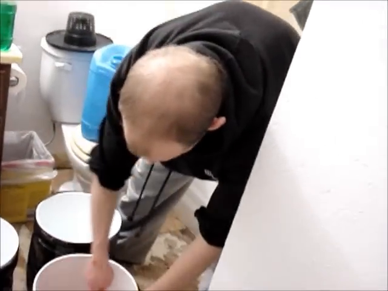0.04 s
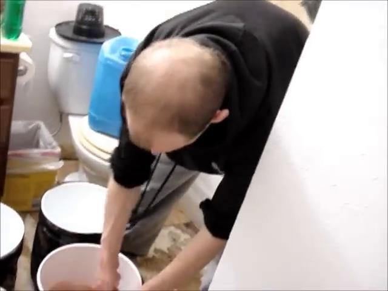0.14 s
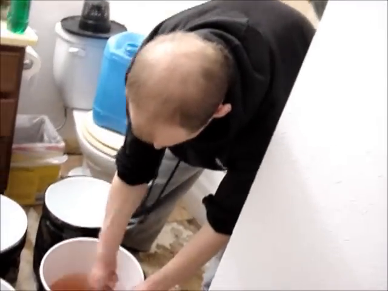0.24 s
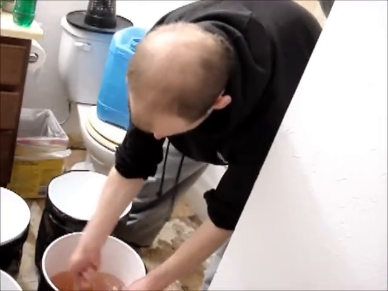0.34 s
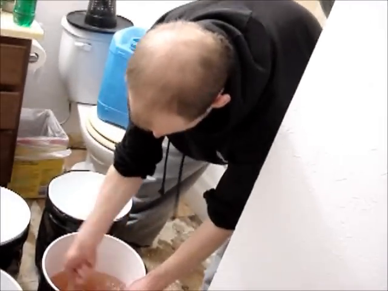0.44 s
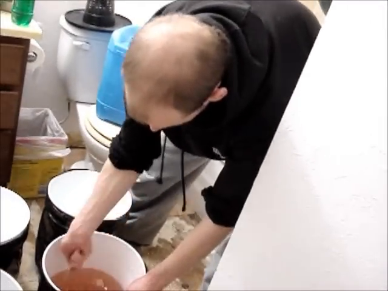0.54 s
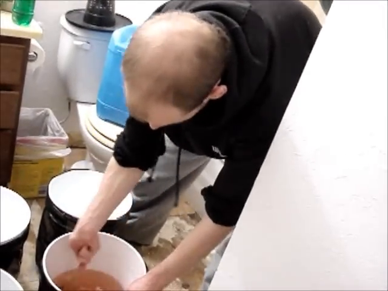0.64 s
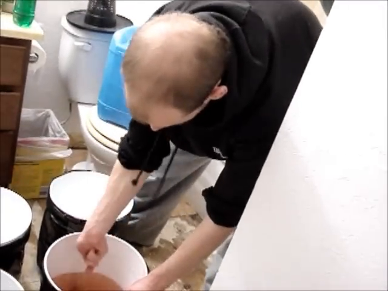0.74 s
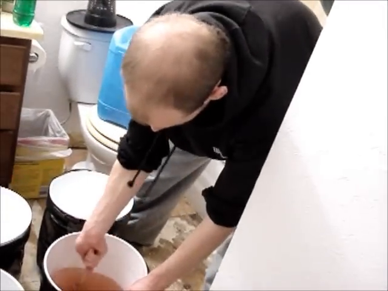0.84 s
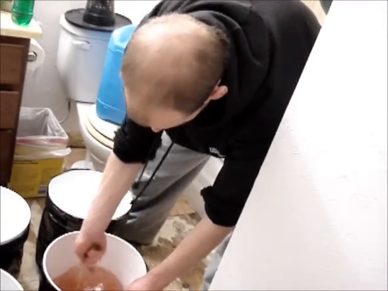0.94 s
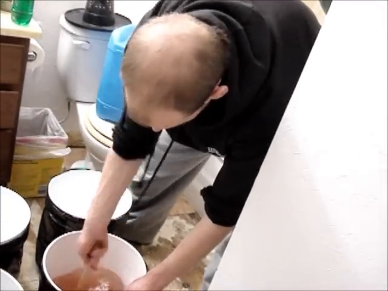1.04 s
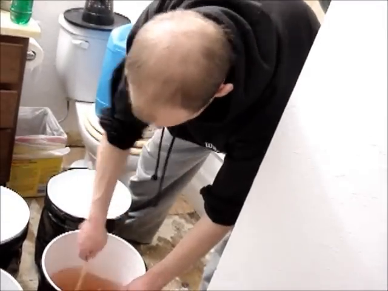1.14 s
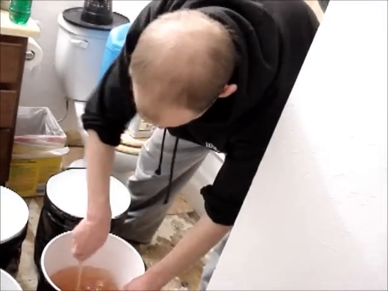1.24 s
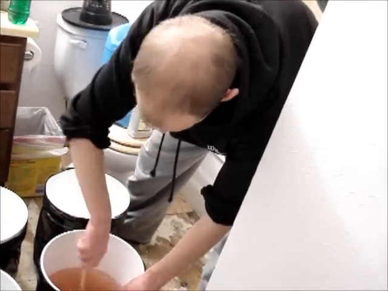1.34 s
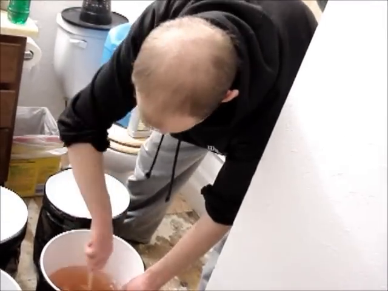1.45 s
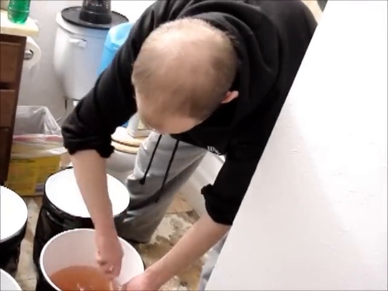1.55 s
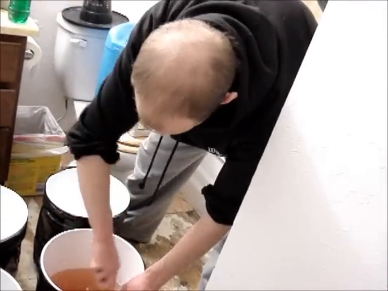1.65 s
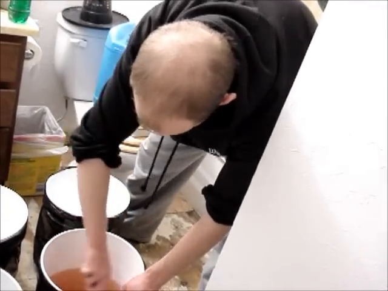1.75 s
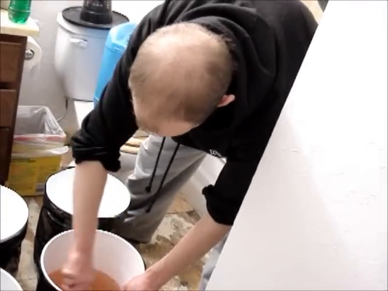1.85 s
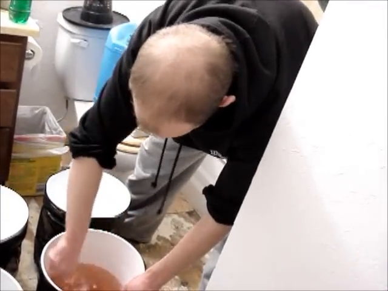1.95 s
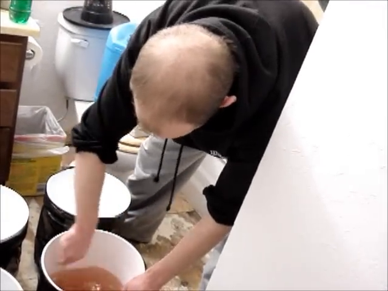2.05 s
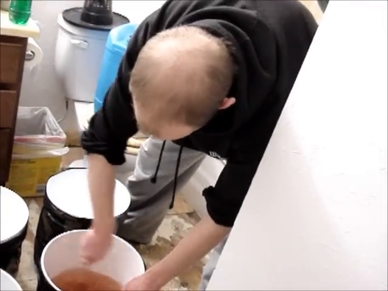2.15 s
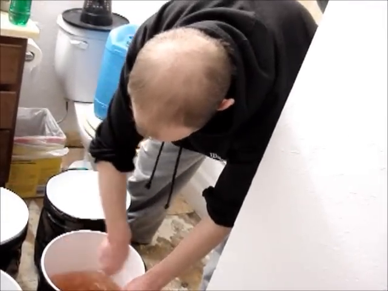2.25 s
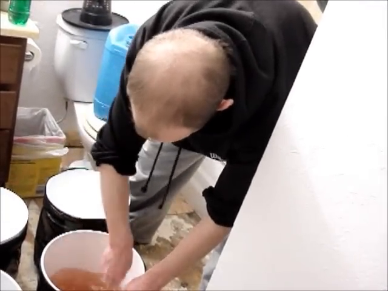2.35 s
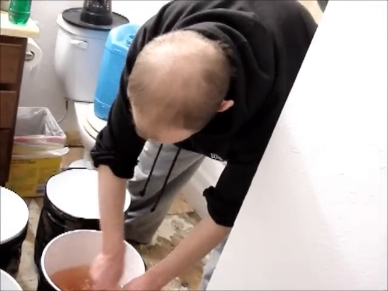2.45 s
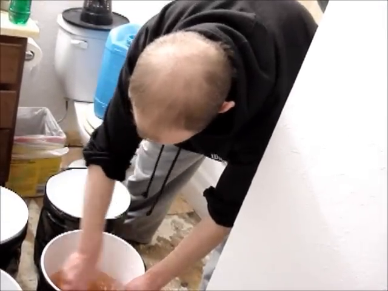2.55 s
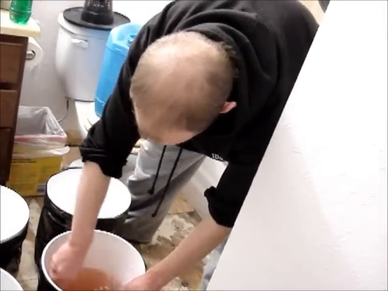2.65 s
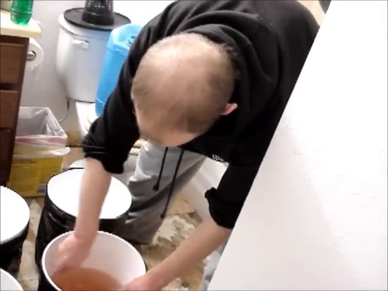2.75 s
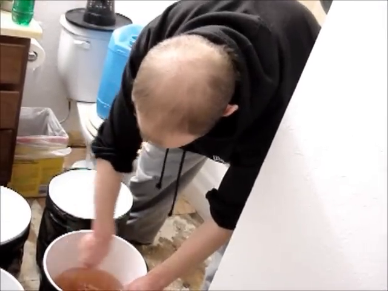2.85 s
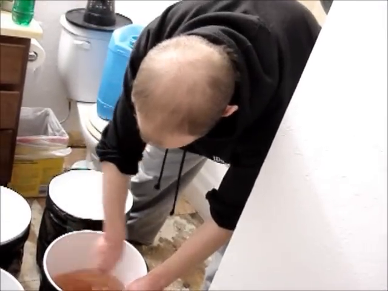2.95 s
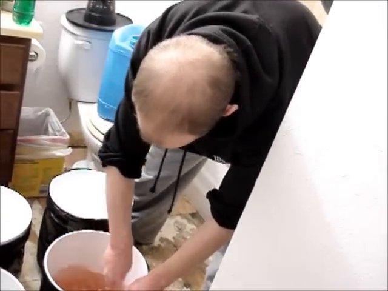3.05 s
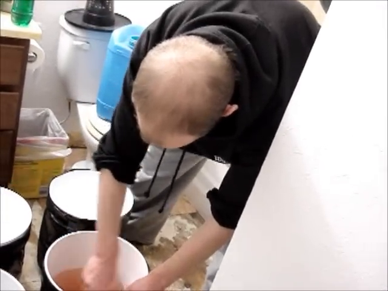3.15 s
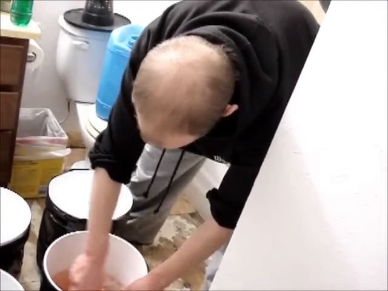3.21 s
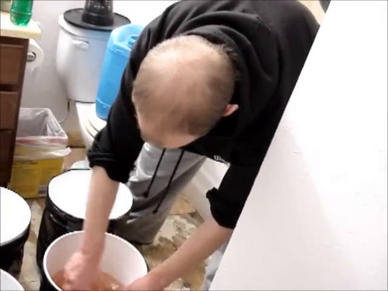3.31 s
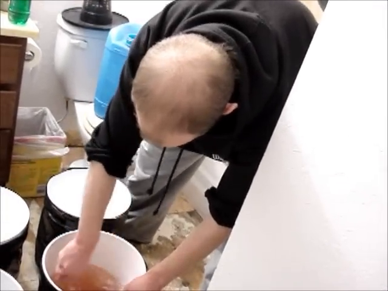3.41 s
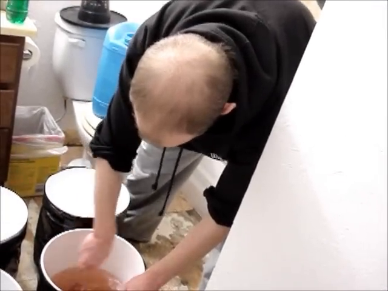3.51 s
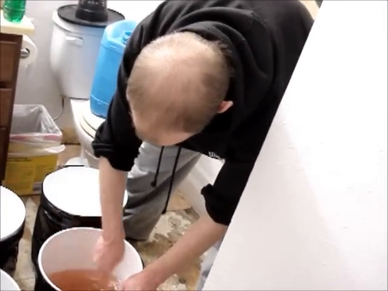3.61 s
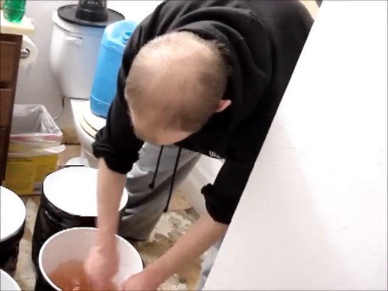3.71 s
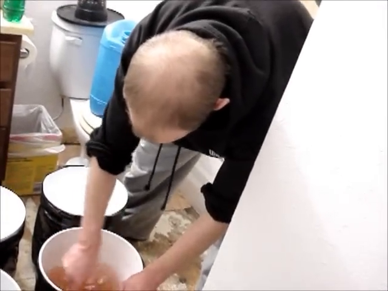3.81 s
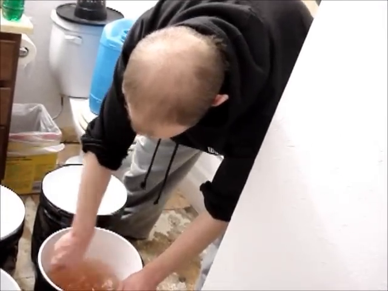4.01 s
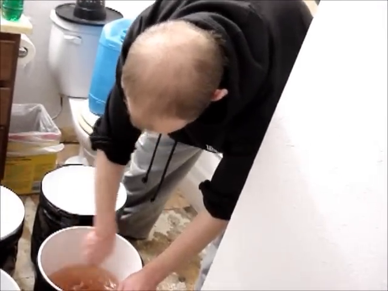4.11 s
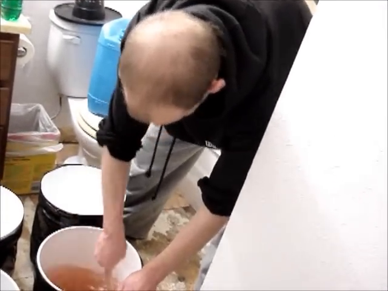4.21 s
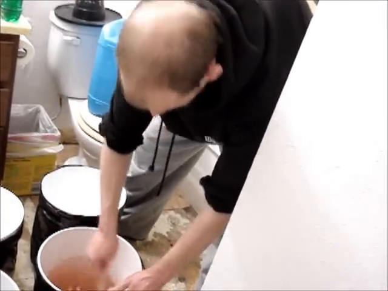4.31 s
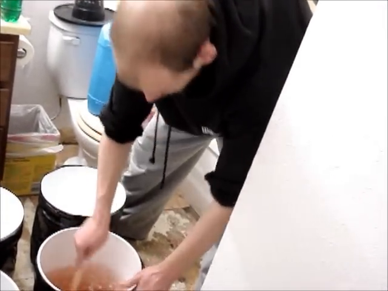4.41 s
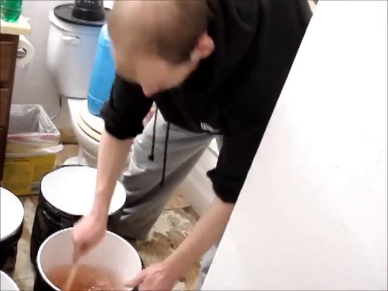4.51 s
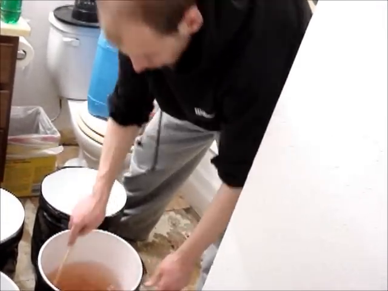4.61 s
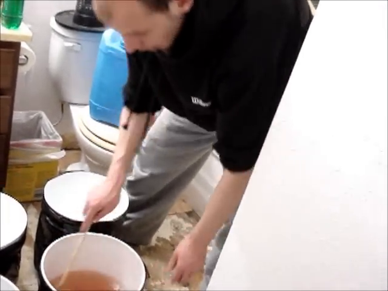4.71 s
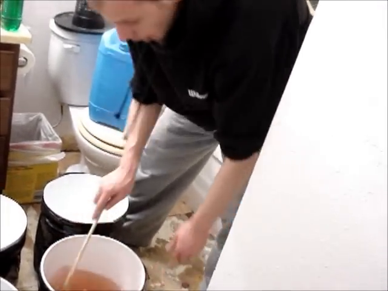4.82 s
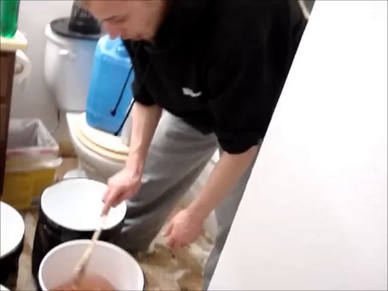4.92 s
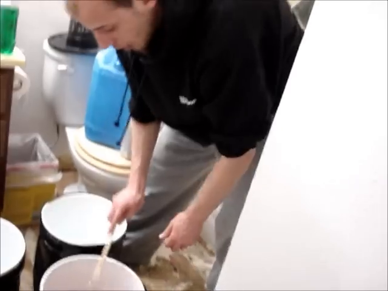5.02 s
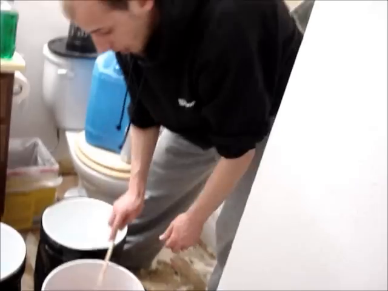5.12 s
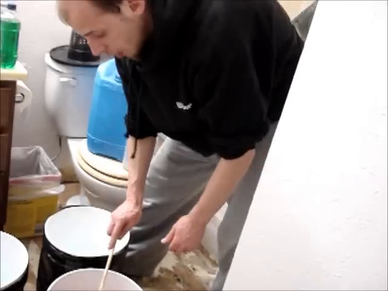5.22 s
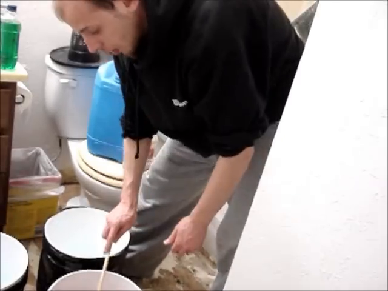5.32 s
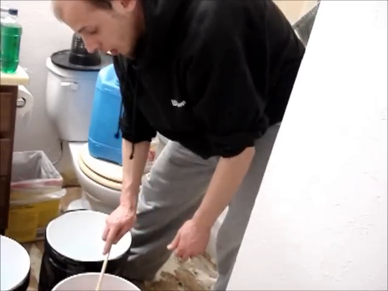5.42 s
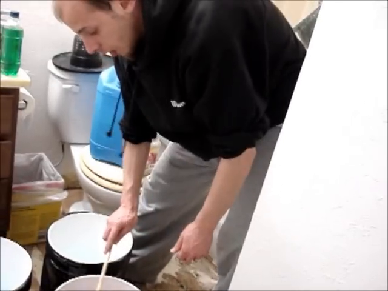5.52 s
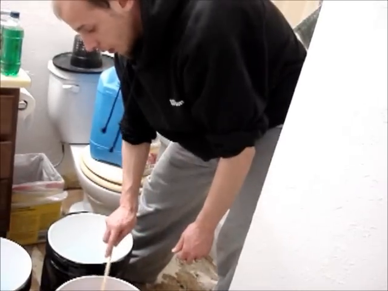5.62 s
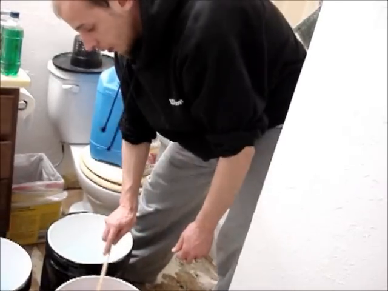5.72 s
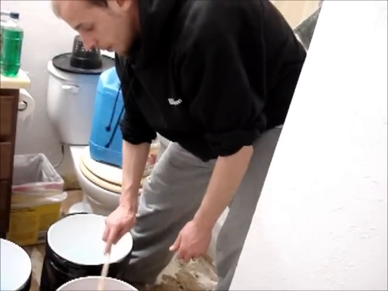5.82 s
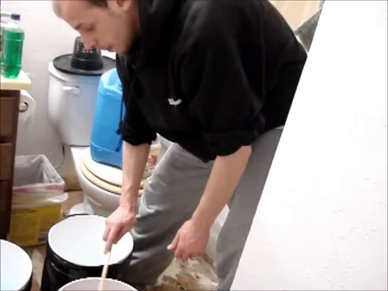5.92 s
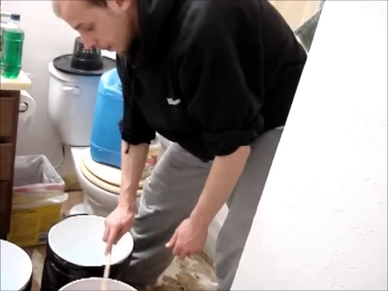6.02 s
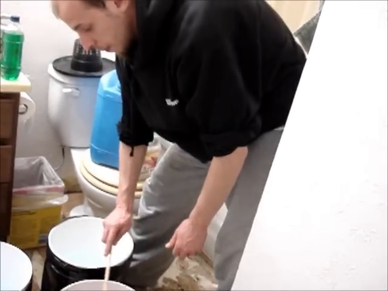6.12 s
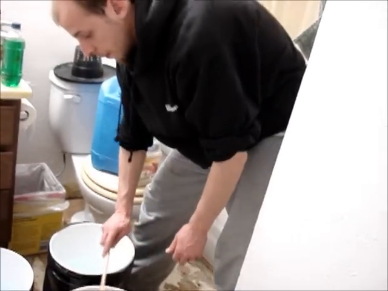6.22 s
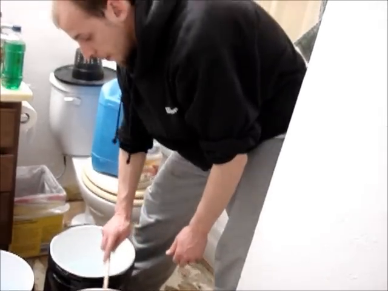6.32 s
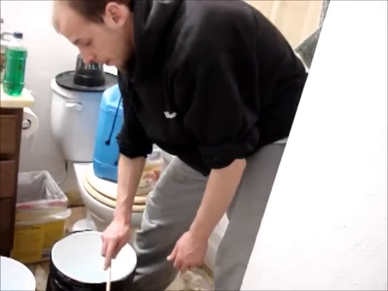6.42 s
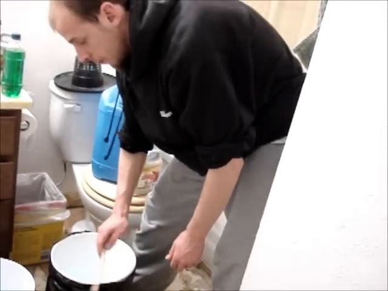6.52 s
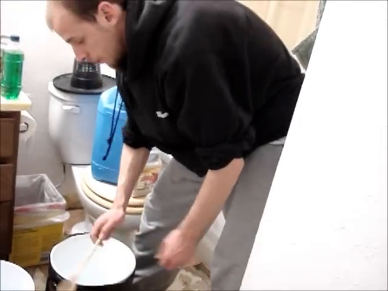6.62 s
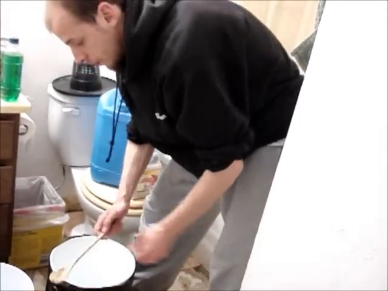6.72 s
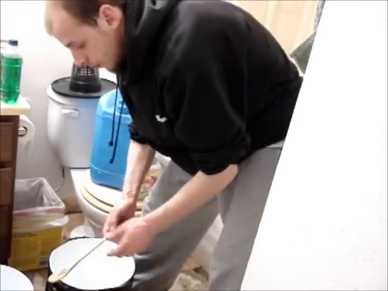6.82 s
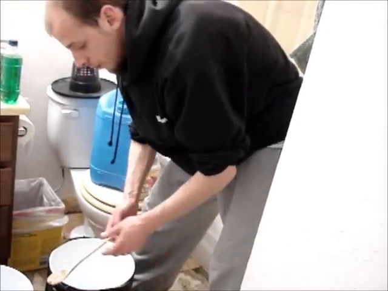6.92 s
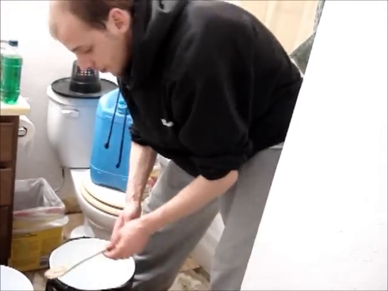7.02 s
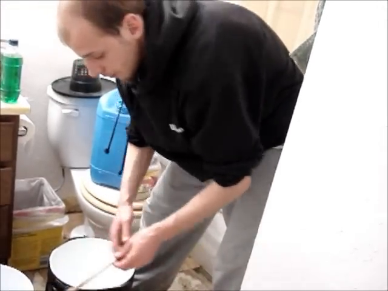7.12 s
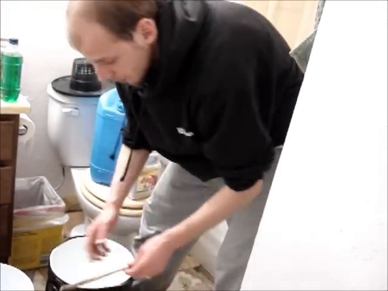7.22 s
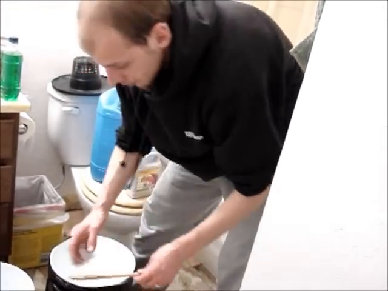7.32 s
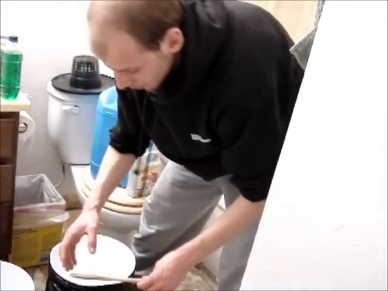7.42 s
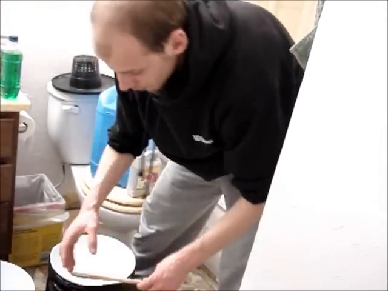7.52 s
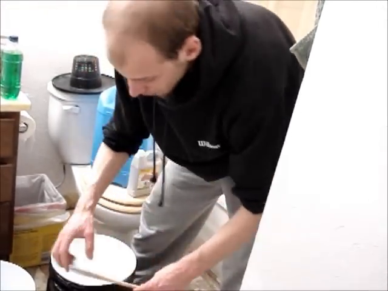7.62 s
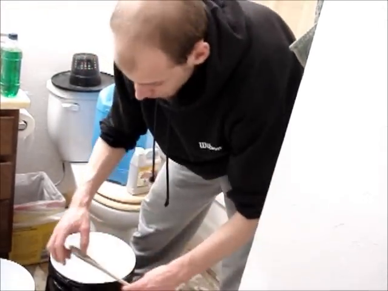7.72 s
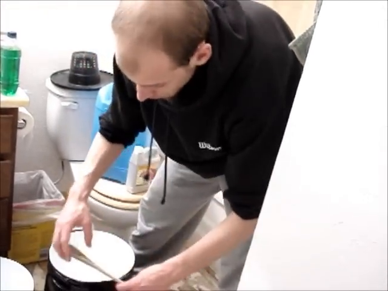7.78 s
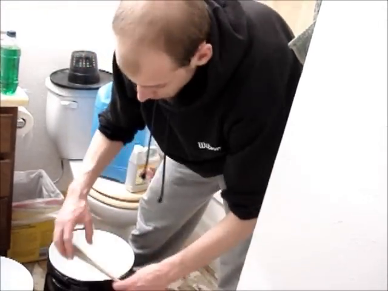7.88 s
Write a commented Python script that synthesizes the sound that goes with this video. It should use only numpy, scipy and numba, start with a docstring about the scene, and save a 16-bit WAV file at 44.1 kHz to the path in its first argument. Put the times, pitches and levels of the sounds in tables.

```python
"""A wooden spoon stirs liquid in a plastic bucket, in a small hard-walled room where a ventilator hums.
From the start the spoon knocks the bucket now and then: rim and wall ring as sets of dying sines.
Meanwhile the liquid sloshes and sprays: crowds of short sines with rising pitch stand for bubbles.
From 5.3 s six raps hit the rim, with low thumps and rumble; the ventilator, shaped noise, runs throughout.
Gain control ducks the background after loud raps and slowly lets it return."""
import sys
import numpy as np
from scipy import signal
from scipy.fft import rfft, irfft
from scipy.io import wavfile
from scipy.ndimage import uniform_filter1d
from numba import njit

SR = 44100
rng = np.random.default_rng(int(sys.argv[2]) if len(sys.argv) > 2 else 0)


def bounce(signal):
    """Save signal as a 16-bit WAV file at the path given by the first command-line argument."""
    frames = np.transpose(np.atleast_2d(signal))
    limited = np.clip(frames, -1, 1)
    pcm = np.round(limited * 32767).astype(np.int16)
    wavfile.write(sys.argv[1], SR, pcm)


N = 350592
T = np.arange(N) / SR  # time in s

# Spoon against bucket: t/s, rim ring level/dB, wall boom level added to rim level/dB (before all booms
# are scaled together), crack level added to rim level/dB, favoured wall pitch f/Hz,
# favoured rim pitch f/Hz, ring time factor
SPOON_BLOWS = [(0.009, -26, -32, -30, 374, 1770, 1.7), (0.275, -36, 2, -20, 355, 820, 1.5),
               (0.334, -33, -3, -6, 457, 1150, 2.2), (0.439, -30, -2.5, -32, 483, 964, 2.1),
               (0.54, -29.5, 2, -22, 410, 1170, 1.8), (0.683, -31, 3.5, -12.5, 417, 807, 1.04),
               (0.709, -42.5, 6, 7.5, 431, 1060, 0.66), (0.758, -37.5, 6.5, -4.5, 446, 1040, 1.1),
               (1.727, -8.5, -8.5, -19.5, 438, 1060, 2), (2.119, -36.5, 3.5, -27, 325, 1250, 1.6),
               (2.309, -22.5, 5, -18.5, 440, 1200, 1.8), (2.363, -24, 0, -20, 427, 835, 0.44),
               (2.536, -32, 12, -8.5, 385, 890, 1.6), (2.794, -28, -14, -13, 345, 1360, 0.95),
               (2.846, -40.5, 10, -3, 333, 1310, 3.1), (3.211, -39.5, 20, -15, 430, 1080, 0.58),
               (3.396, -33.5, -1, -8, 427, 977, 1), (3.544, -24.5, -0.5, -23.5, 366, 1160, 1.4),
               (3.875, -30, 10.5, -11, 397, 931, 1.66), (4.147, -27.5, 1, -9, 301, 1030, 0.17),
               (4.398, -24.5, -9, -10, 427, 1244, 3), (4.443, -21.5, -8.5, -10.5, 404, 1460, 4.8),
               (4.72, -27, -3, -5.5, 430, 910, 0.87), (5.259, -6, -8.5, -17.5, 465, 1070, 0.92),
               (5.501, -1.5, -17, -15.5, 434, 940, 2.7), (5.749, 0, -17, -12, 450, 1105, 2.6),
               (5.988, -1.5, -28, -7.5, 420, 1310, 8.4), (6.215, -3.5, -23, -6.5, 410, 1410, 0.98),
               (6.458, -2, -18.5, -9, 423, 1640, 1.93)]
# Ways the bucket wall can ring: f/Hz, relative level/dB, time to fall 60 dB t/s
WALL_MODES = [(276.5, 0.5, 0.36), (333, 3.5, 0.13), (392.5, 3.5, 0.074), (420, 4, 0.084),
              (453.3, 7.5, 0.11), (543.7, 6.5, 0.12), (622, 8, 0.14)]
# Ways the rim can ring: f/Hz, relative level/dB, time to fall 60 dB t/s
RIM_MODES = [(721, -21.5, 0.29), (818, -14.5, 0.33), (846, 4, 0.035), (931, -5, 0.09), (1021, 1, 0.068),
             (1160, 1, 0.038), (1230, 4.5, 0.042), (1290, 6, 0.027), (1416, 2.5, 0.048),
             (1550, -5.5, 0.073), (1706, 5.5, 0.013), (2036, 4.5, 0.015), (2284, -0.5, 0.025),
             (2600, -4, 0.017), (3260, -10, 0.03), (3836, 5, 0.0075)]
# Low thump and rumble with the hard raps: t/s, thump level/dB, rumble level/dB
RAP_THUMPS = [(5.258, -28, -35), (5.504, -23, -28.5), (5.753, -19, -28), (5.987, -23, -31.5),
              (6.213, -46, -35), (6.453, -38, -32.5)]
# Surges raised by pushes of the spoon: crest t/s, slosh level/dB, fine spray level/dB, rise t/s,
# bubble pitch f/Hz
SPOON_SURGES = [(0.01, -37, -47.5, 0.044, 1316), (0.13, -43.5, -48.5, 0.11, 1610),
                (0.21, -41.5, -62, .05, 1997), (0.30, -44, -64, 0.021, 1320), (0.46, -41.5, -53, .08, 1150),
                (0.56, -45, -44.5, 0.0042, 1115), (0.64, -50.5, -72, .05, 1225),
                (0.71, -43.5, -68, 0.034, 1160), (0.82, -61.5, -51, 0.017, 1680),
                (1.74, -44, -68, 0.005, 1190), (1.852, -36.5, -51.5, 0.041, 1290),
                (1.972, -36.5, -52, 0.13, 1562), (2.068, -36.5, -41.5, 0.074, 1300),
                (2.162, -44, -46.5, 0.025, 1550), (2.409, -40.5, -59.5, .2, 1040),
                (2.55, -44.5, -73, 0.082, 1030), (2.68, -40, -44, 0.039, 1180),
                (2.77, -47.5, -52, .06, 1840), (2.93, -44, -50, 0.037, 1254), (3.028, -42, -57, 0.13, 1767),
                (3.116, -39.5, -50, 0.0074, 1590), (3.339, -39, -53, .08, 1416),
                (3.60, -44, -62, 0.14, 1106), (3.69, -43, -54.5, 0.12, 1780),
                (3.819, -42.5, -54, 0.071, 1880), (3.882, -48, -49, 0.075, 1010),
                (4.04, -38.5, -61, 0.077, 1830), (4.108, -47, -49, 0.08, 1820),
                (4.28, -39.5, -51, .09, 1580), (4.471, -46, -48, .1, 1464), (4.63, -58.5, -82, 0.052, 1240),
                (4.733, -66, -44, 0.009, 1050), (5.01, -49.5, -62, 0.018, 1920)]
# Small bursts of bubbles of nearly one size: t/s, level of each bubble/dB, pitch f/Hz
BUBBLE_BURSTS = [(0.18, -33, 2280), (0.195, -32.5, 8000), (0.208, -37, 2500), (0.559, -34.5, 4630),
                 (0.5626, -28.5, 8100), (0.7072, -50, 1110), (0.8031, -40.5, 2030), (0.806, -52, 3530),
                 (2.0296, -28, 1430), (2.0497, -33, 1230), (2.089, -35.5, 1570), (2.6583, -37, 1230),
                 (2.752, -32, 2300), (2.791, -34, 1380), (2.828, -39.5, 1760), (3.0166, -38, 1730),
                 (3.369, -41.5, 1650), (3.7007, -40.5, 1780), (3.8433, -33.5, 3980), (4.0966, -38, 2140),
                 (4.0986, -32, 5970), (4.1394, -70, 6040), (4.4006, -41, 1320), (4.459, -56, 1417),
                 (4.499, -50.5, 1290), (4.7206, -32.5, 8500), (4.7229, -40, 2060), (5.0003, -37, 5230)]
# Colour of the ventilator's air noise: f/Hz, relative level per Hz/dB
FAN_COLOUR = [(18, -40), (30, -26), (86, -18), (340, -7), (467, -9.5), (541, -11.5), (744, -15), (821, -15),
              (2240, -23), (3010, -24.5), (4140, -28.5), (7820, -34), (9760, -34), (10500, -73),
              (13600, -88), (22000, -120)]
# Centres of the ventilator's narrow whines: f/Hz
WHINE_HZ = [342, 542, 709, 830, 1200, 2445, 2535, 2670, 2970, 3630, 7570]
# The same whines, in the same order: filter width f/Hz, level before wavering/dB
WHINE_WIDTHS_LEVELS = [(39.8, -50), (30.2, -55), (20, -60.5), (40, -60.5), (30, -62.5), (25, -73),
                       (56, -61.5), (80, -66), (25, -63), (70, -66.5), (70, -65.5)]
# How long the room echoes: band centre f/Hz, time to fall 60 dB t/s
ROOM_DECAY = [(150, 0.43), (400, 0.27), (1000, 0.066), (2500, 0.2), (6000, 0.27)]

RIM_BUILD_S, RIM_WET_DB = 0.009, 3.5  # how slowly the rim's echoes pile up, and their level
WALL_DB, WALL_WET_DB = -39, -12  # rms level of all wall booms; level of their echoes
RISE_DB = 10  # level a surge gains over its rise time
SLOSH_FALL_DB_S, SPRAY_FALL_DB_S = 128, 259  # how fast a surge subsides
SPRAY_HZ = 5250  # middle pitch of the droplets
FAN_DB = -44.5  # rms level of the air noise
HISS_DB = -60.5  # rms level of the amplifier hiss before the overload
TOP_HZ = 10100  # treble above this is cut


def blows():
    """Each blow rings rim and wall; the contact is a sharp click and a few milliseconds of rattle."""
    rim, wall = np.zeros(N), np.zeros(N)
    t = T[:SR // 3]
    for s, rim_db, boom_db, crack_db, boom_hz, rim_hz, lasting in SPOON_BLOWS:
        click = 1. * (t == 0)
        rattle = 0.068 * rng.standard_normal(len(t)) * np.exp(-t / 0.0011)
        crack = level(band(click + rattle, 1480, 2000), -23.5)
        knock = ring(RIM_MODES, 1.34, rim_hz, 7.2, min(lasting, 1.1))
        knock = np.pad(knock, (0, SR // 8))  # leaves time for the echoes
        boom = ring(WALL_MODES, 1.0, boom_hz, 31, lasting)
        # every blow lands on a new spot, so the room sends back a new pattern of echoes
        add(rim, s, undb(rim_db) * room(knock, RIM_WET_DB, RIM_BUILD_S))
        add(rim, s, undb(rim_db + crack_db) * room(crack, 7.0, 0.0004))
        add(wall, s, undb(rim_db + boom_db) * boom)
    push = np.hanning(int(0.0023 * SR))  # liquid cushions the blow on the wall
    wall = level(signal.fftconvolve(wall, push)[:N], WALL_DB)
    low_cut = signal.butter(4, 200, "highpass", fs=SR, output="sos")
    return signal.sosfilt(low_cut, rim), signal.sosfilt(low_cut, wall)


def ring(modes, scatter_db, centre_hz, focus_db, lasting):
    """Dying sines after one blow, peak 1; the struck spot favours modes near its own pitch."""
    hz, db, t60 = np.transpose(modes)[:, :, None]
    t = T[:SR // 3]
    chance = rng.standard_normal((len(modes), 1))
    octaves_away = np.abs(np.log2(hz / centre_hz))
    start_db = db + scatter_db * chance - focus_db * octaves_away
    sign = (-1) ** np.arange(len(modes))[:, None]  # neighbours swing in opposite directions
    fading = undb(start_db - 60 * t / (lasting * t60))
    y = np.sum(sign * fading * np.sin(2 * np.pi * hz * t), axis=0)
    return y / np.max(np.abs(y))


def thumps():
    """Hard raps bring a deep, quickly dying 20 Hz thump from the overloaded recorder, and a dull rumble."""
    out = np.zeros(N)
    t = T[:SR // 3]
    for s, thump_db, rumble_db in RAP_THUMPS:
        thump = np.sin(2 * np.pi * 20 * t) * np.exp(-t / 0.012)
        low = level(band(rng.standard_normal(len(t)), 98, 44), 1.5)
        high = level(band(rng.standard_normal(len(t)), 203, 110), 1.8)
        swell_and_fade = np.exp(-t / 0.062) * (1 - np.exp(-t / 0.01))
        rumble = (low + high) * swell_and_fade
        add(out, s, undb(thump_db) * thump / thump.max() + undb(rumble_db) * rumble)
    return out


def liquid():
    """Gurgling bubbles and fine spray follow the surges; some bursts of bubbles stand out."""
    # tiny starting values avoid dividing by zero
    slosh, spray, weighted_hz = 1e-9, 0, 1e-6
    for s, slosh_db, spray_db, rise_s, hz in SPOON_SURGES:
        power = surge(s, slosh_db, rise_s, SLOSH_FALL_DB_S) ** 2
        slosh = slosh + power
        weighted_hz = weighted_hz + hz * power  # the strongest surge counts most for bubble pitch
        spray = spray + surge(s, spray_db, rise_s, SPRAY_FALL_DB_S) ** 2
    gurgle = swarm(count=3500, hz=weighted_hz / slosh, spread=0.454, cycles=9.4, glide=0.084)
    drops = swarm(count=16000, hz=np.full(N, 1. * SPRAY_HZ), spread=0.442, cycles=4.5, glide=0.023)
    return np.sqrt(slosh) * gurgle + np.sqrt(spray) * drops + plinks()


def surge(crest_s, db, rise_s, fall_db_s):
    """Gain of one surge: a steady climb in dB to its crest, then a steady fall."""
    climb = RISE_DB * (crest_s - T) / rise_s
    fall = fall_db_s * (T - crest_s)
    return undb(db - np.maximum(climb, fall))


def swarm(count, hz, spread, cycles, glide):
    """A dense random crowd of bubbles around a moving pitch, rms 1."""
    start = rng.integers(0, N, count)
    pitch = np.clip(hz[start] * np.exp(spread * rng.standard_normal(count)), 200, 10000)
    size = undb(1.97 * np.minimum(rng.exponential(1, count), 4.5))  # a few are much louder
    return level(bubbles(start, pitch, np.full(count, cycles), size, glide, N), 0)


def plinks():
    """Bursts of eight bubbles of nearly one pitch, crowded towards the start of each 30 ms."""
    when, db, pitch = np.repeat(np.transpose(BUBBLE_BURSTS), repeats=8, axis=1)
    delay, detune = rng.random((len(when), 2)).T
    start = ((when + 0.03 * delay ** 1.5) * SR).astype(np.int64)
    pitch = pitch * (0.942 + 0.17 * detune)
    return bubbles(start, pitch, np.full(len(when), 5.5), undb(db), 0.0057, N)


@njit
def bubbles(start, hz, cycles, size, glide, count):
    """Each bubble is a dying sine whose pitch rises as it nears the surface."""
    out = np.zeros(count)
    for k in range(len(start)):
        length = cycles[k] * SR / hz[k]  # samples to fade to about a third
        phase = 0.
        for i in range(min(int(6 * length), count - start[k])):
            pitch = min(hz[k] * (1 + glide * i / length), .45 * SR)
            phase += 2 * np.pi * pitch / SR
            out[start[k] + i] += size[k] * np.exp(-i / length) * np.sin(phase)
    return out


def fan():
    """The ventilator: broad air noise in wavering bands, with narrow whines of filtered noise on top."""
    hz, db = np.transpose(FAN_COLOUR)
    f = np.maximum(np.fft.rfftfreq(N, 1 / SR), 1)
    colour = undb(np.interp(np.log(f), np.log(hz), db))
    air, swell = 0, walk(0.59)  # the slow swell is shared by all bands
    for centre in 30 * 2. ** np.arange(9):  # overlapping bands an octave apart
        share = np.cos(np.pi / 2 * np.clip(np.log2(f / centre), -1, 1))
        part = irfft(rfft(rng.standard_normal(N)) * share * colour, N)
        air = air + part * undb(0.5 * swell + 2.1 * walk(9.9))
    whines = 0
    for centre, (width, whine_db) in zip(WHINE_HZ, WHINE_WIDTHS_LEVELS):
        tone = band(band(rng.standard_normal(N), centre, width), centre, width)
        whines = whines + level(tone, whine_db) * undb(0.5 * walk(7.1))
    return level(air, FAN_DB) + whines


def room(x, wet_db, build_s):
    """Direct sound, then a tail of dense reflections that builds up and dies band by band."""
    t = T[:int(.4 * SR)]
    tail = 0
    for hz, t60 in ROOM_DECAY:
        noise = level(band(rng.standard_normal(len(t)), hz, hz), 0)
        tail = tail + noise * np.sqrt(hz) * undb(-60 * t / t60)  # wider bands carry more power
    tail = tail * (1 - np.exp(-t / build_s))
    tail = tail / np.sqrt(np.sum(tail ** 2))
    return x + undb(wet_db) * signal.fftconvolve(x, tail)[:len(x)]


def undb(db):
    """Decibels to gain."""
    return 10 ** (np.asarray(db) / 20)


def level(x, db):
    """Scale to an rms level in dB."""
    return x * undb(db) / np.sqrt(np.mean(x ** 2))


def band(x, hz, width):
    """Two-pole resonance that lets one pitch region through, gain 1 at the centre."""
    return signal.lfilter(*signal.iirpeak(hz, hz / width, SR), x)


def walk(rate):
    """Random levels held for 1 / rate s and smoothed twice; spread near 1."""
    k = int(SR / rate)
    steps = np.repeat(rng.standard_normal(N // k + 1), k)
    return 1.3 * uniform_filter1d(uniform_filter1d(steps, k), k)[:N]


def add(out, s, sound):
    """Mix a sound in at time s, in seconds."""
    i = max(int(s * SR), 0)
    out[i:i + len(sound)] += sound[:N - i]


@njit
def ride(x, top, slope, attack, release):
    """Gain control: loud sound pulls the gain down quickly, quiet lets it creep back."""
    y, loudness = np.empty(len(x)), top
    for i in range(len(x)):
        a = abs(x[i])
        loudness += (a - loudness) * (attack if a > loudness else release)
        y[i] = x[i] * (top / max(loudness, top)) ** slope
    return y


def scene():
    """The rim rings freely into the room; the wall, damped by the liquid, is heard drier."""
    rim, wall = blows()
    knocks = rim + room(wall, WALL_WET_DB, 0.018) + thumps()
    return (knocks + room(liquid(), 0.4, 0.00022) + fan())[None]


def record(dry):
    """Gain control, amplifier hiss behind it, soft overload on the loudest peaks and the treble cut."""
    x = ride(dry[0], undb(-24.0), 0.49, 1 / (SR * .08), 1 / (SR * 1.5))  # reacts in 0.08 s, recovers in 1.5 s
    x = x + level(band(rng.standard_normal(N), 2000, 2500), HISS_DB)
    x = np.tanh(0.83 * x) / 0.81
    return signal.sosfilt(signal.ellip(10, .2, 70, TOP_HZ, fs=SR, output="sos"), x)[None]


dry = scene()
out = record(dry)
bounce(out)
```